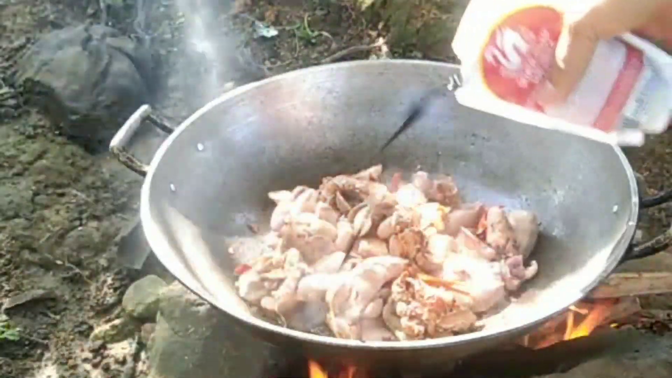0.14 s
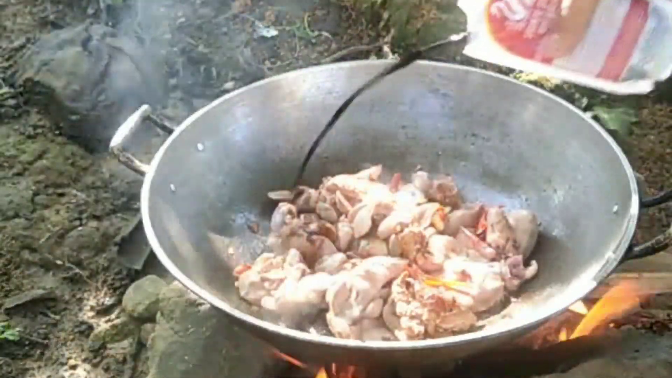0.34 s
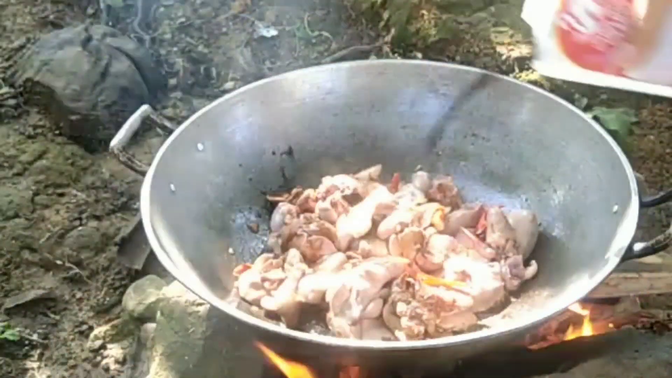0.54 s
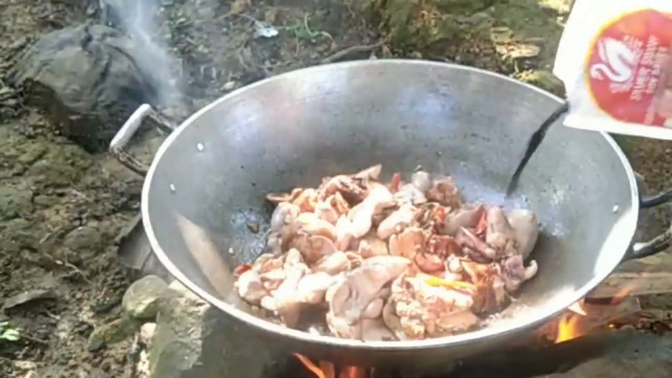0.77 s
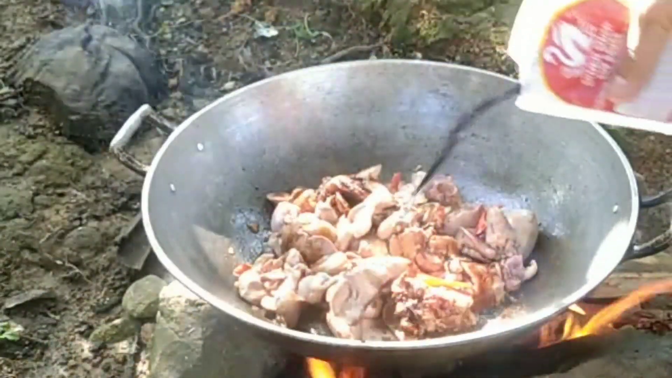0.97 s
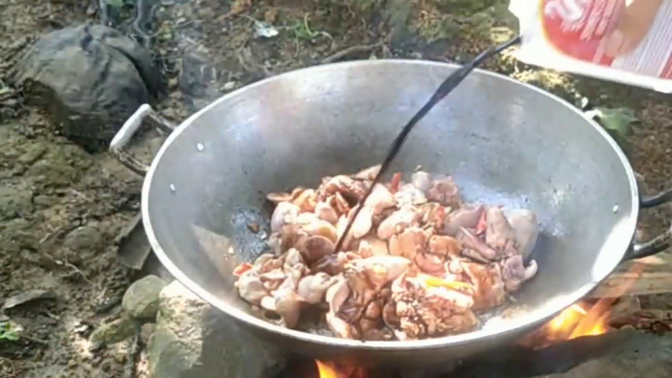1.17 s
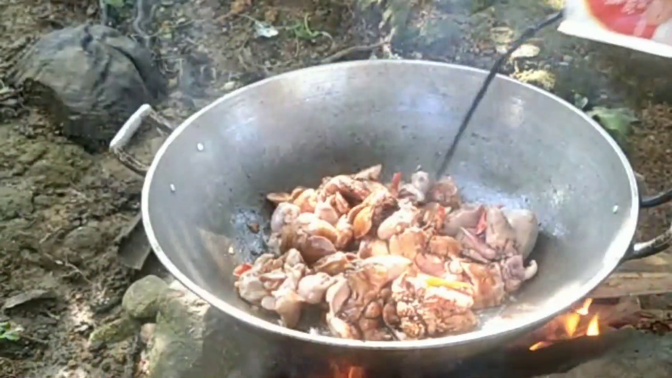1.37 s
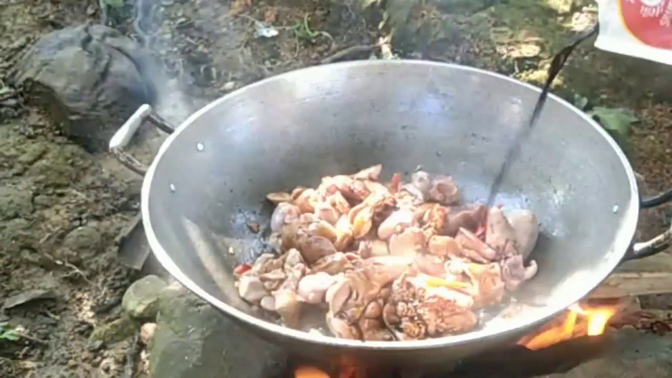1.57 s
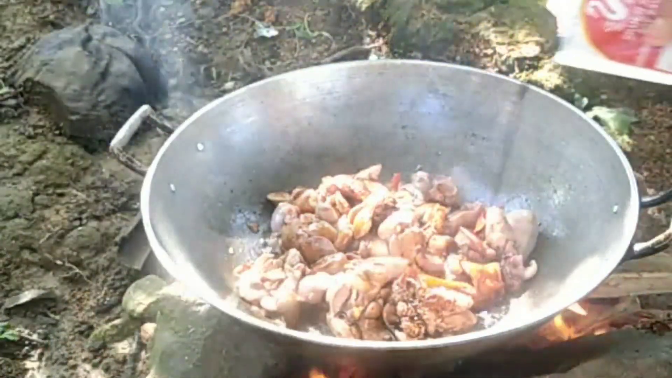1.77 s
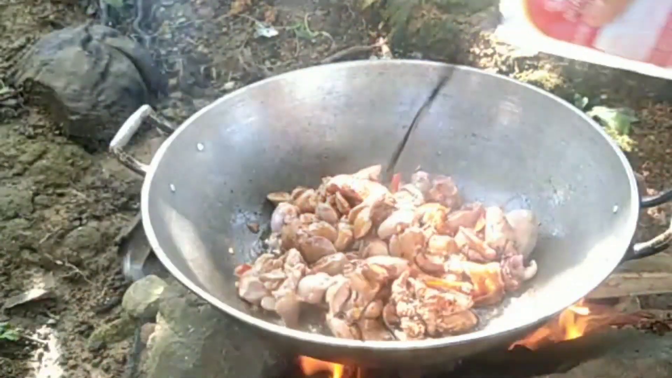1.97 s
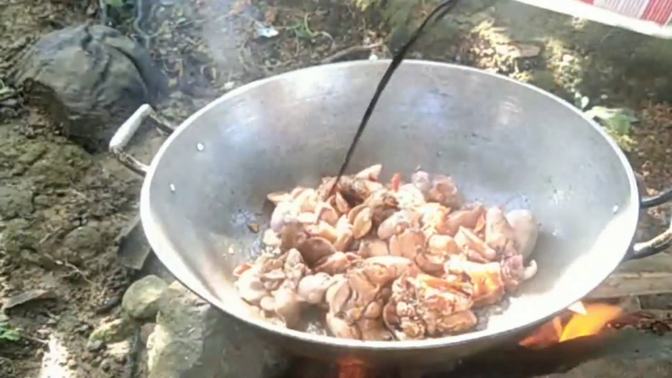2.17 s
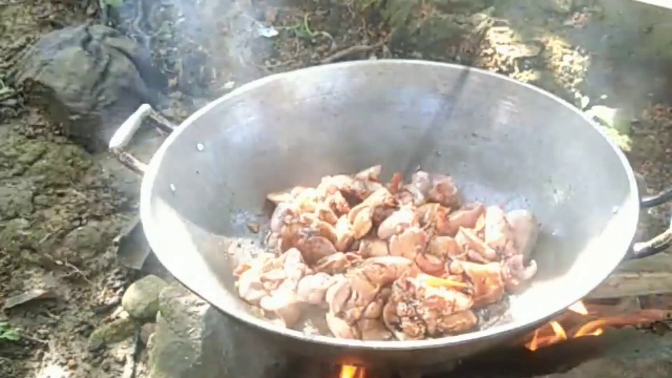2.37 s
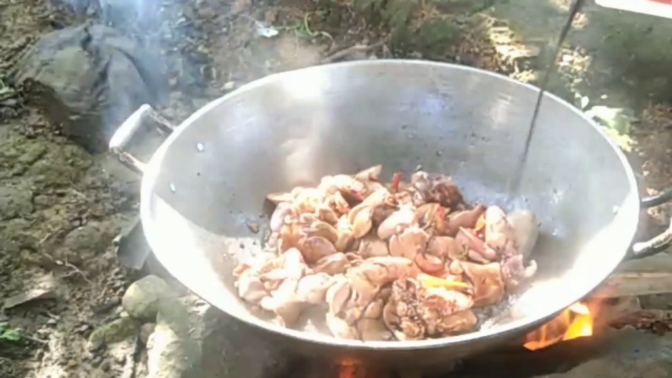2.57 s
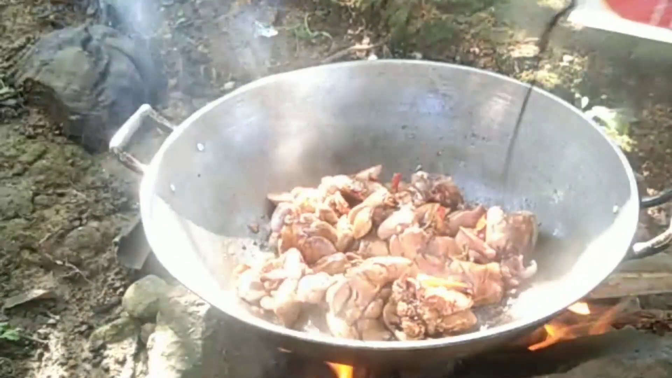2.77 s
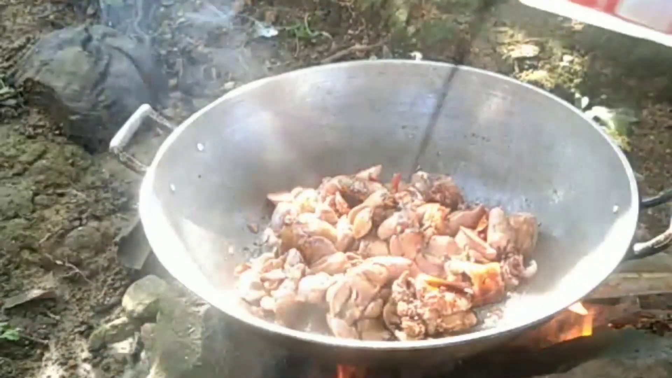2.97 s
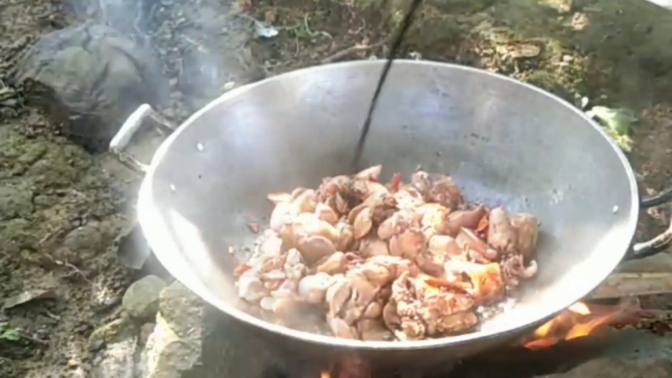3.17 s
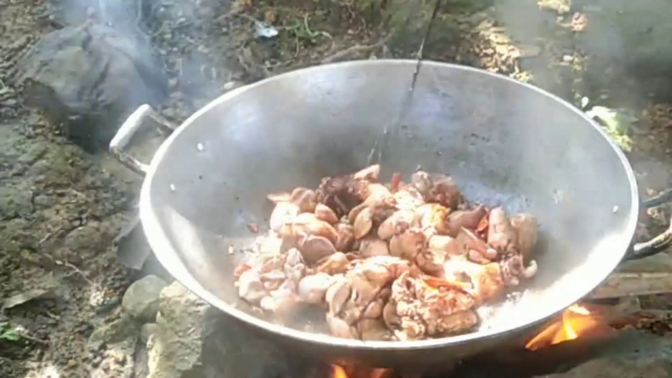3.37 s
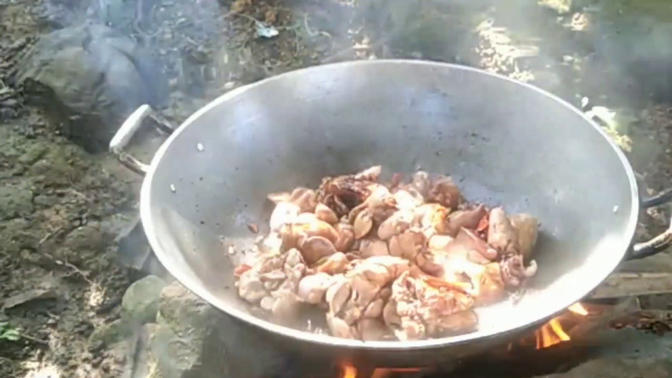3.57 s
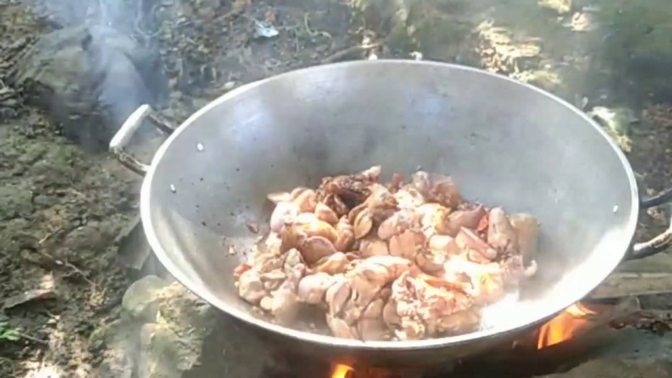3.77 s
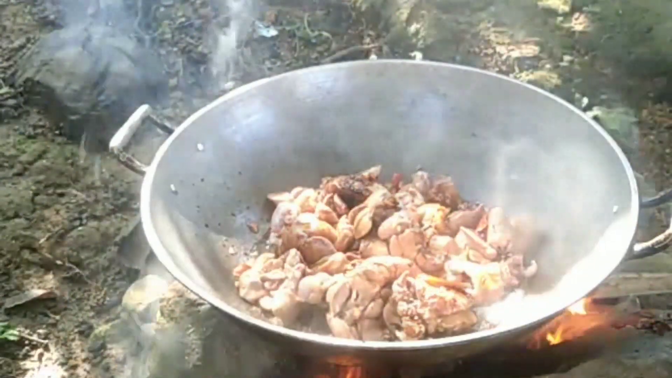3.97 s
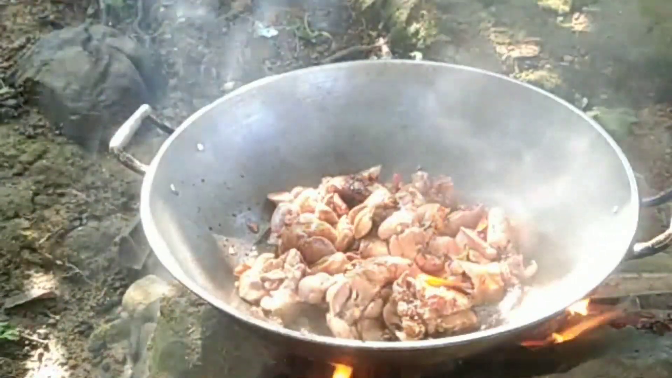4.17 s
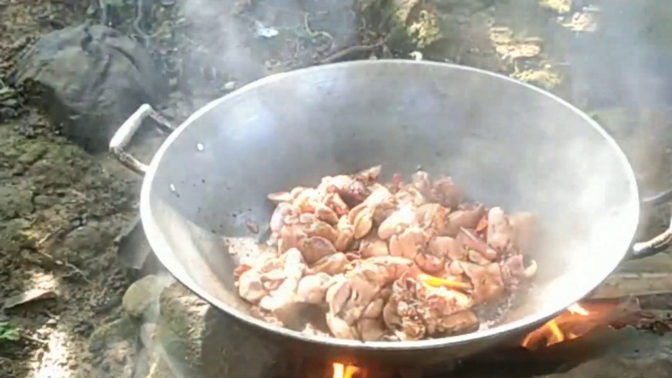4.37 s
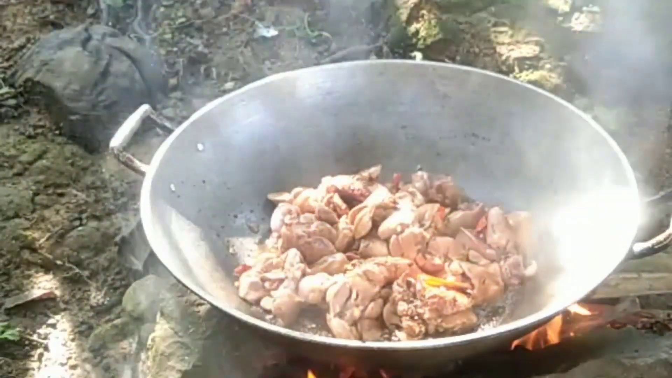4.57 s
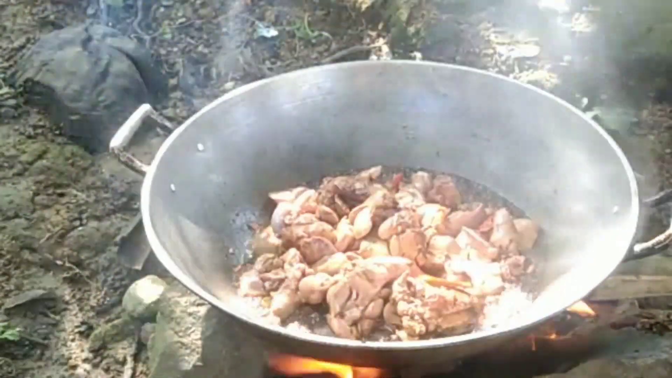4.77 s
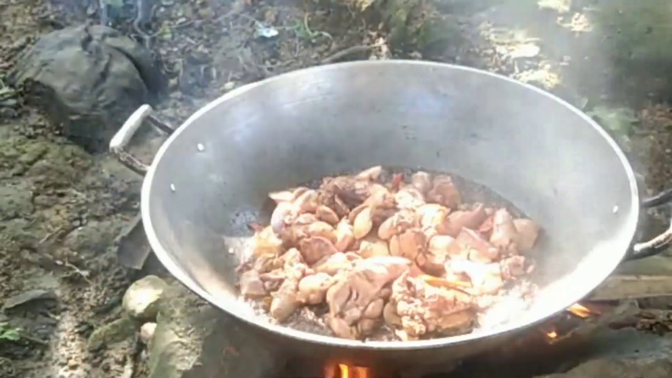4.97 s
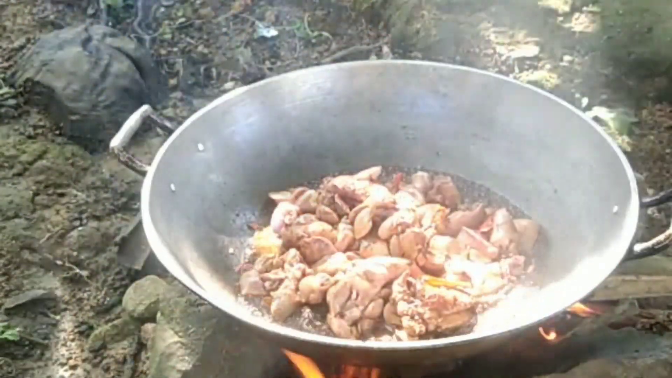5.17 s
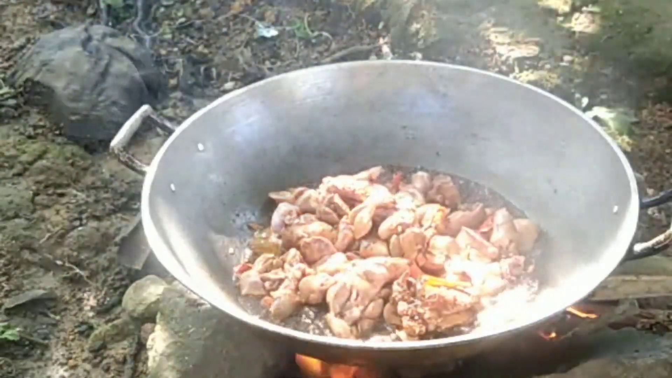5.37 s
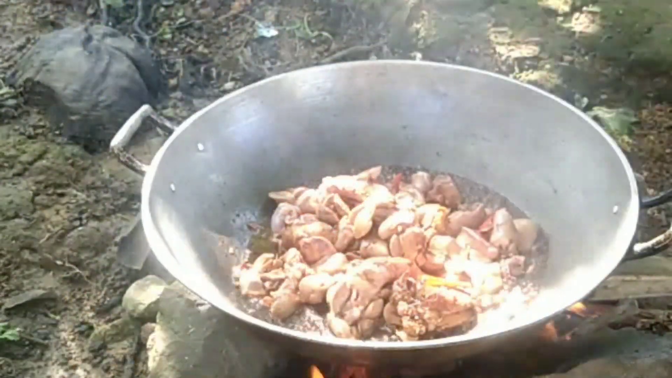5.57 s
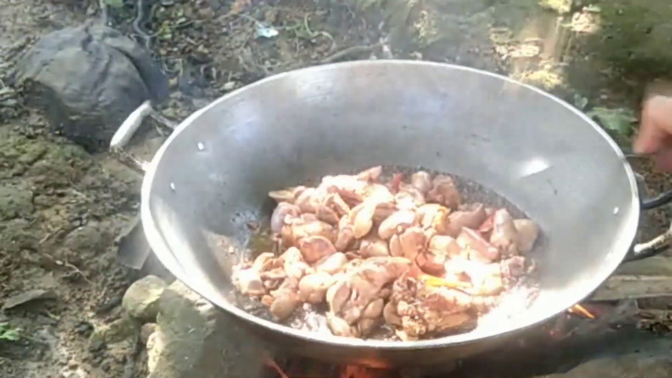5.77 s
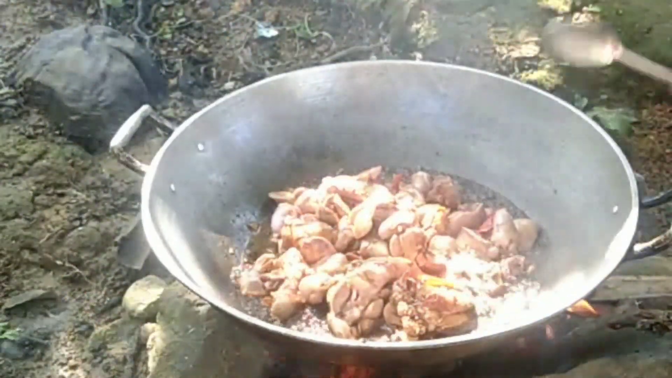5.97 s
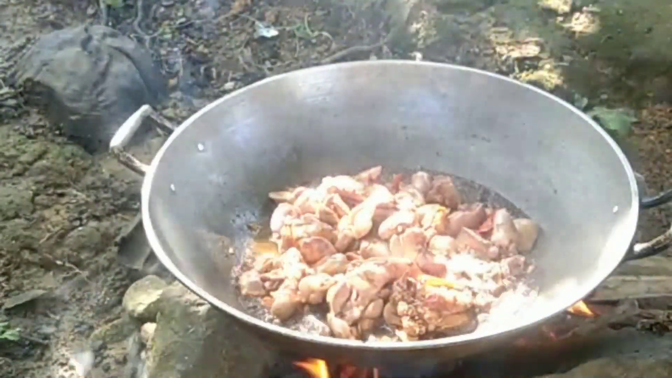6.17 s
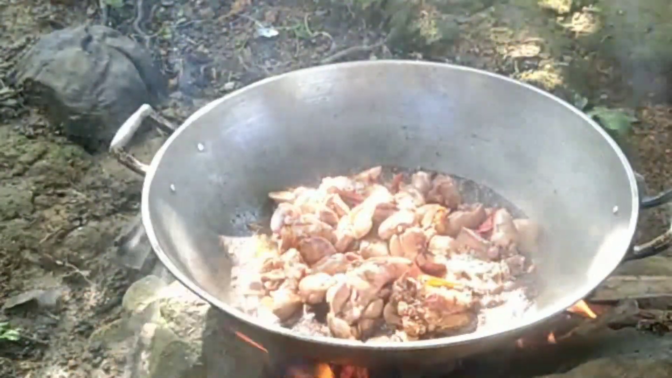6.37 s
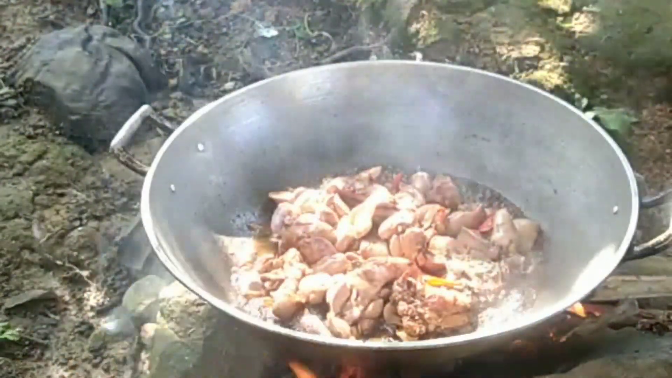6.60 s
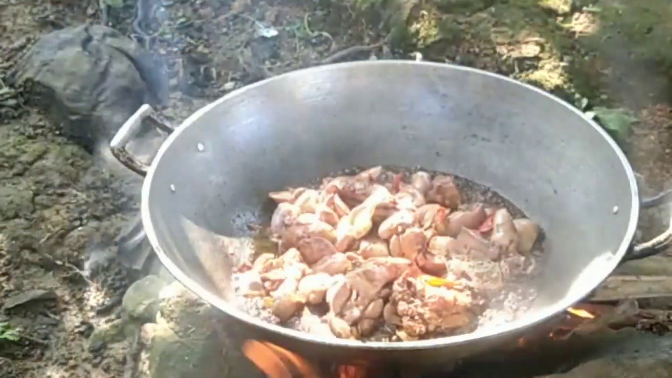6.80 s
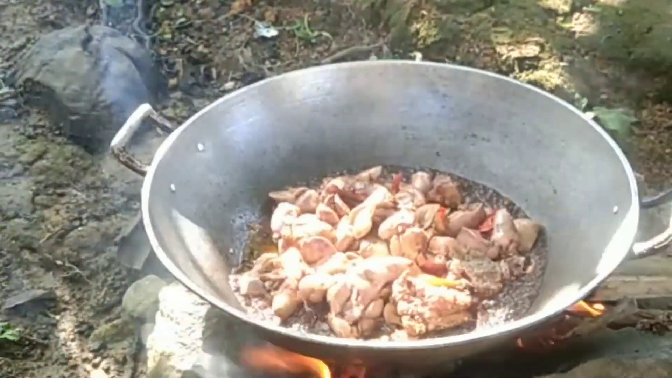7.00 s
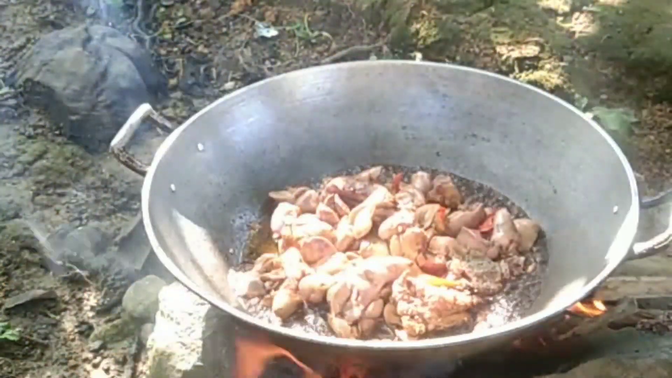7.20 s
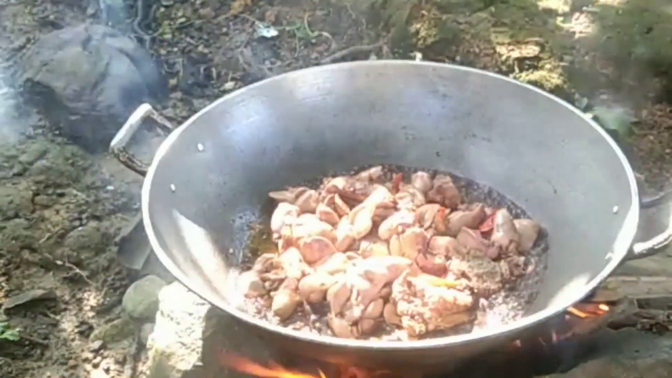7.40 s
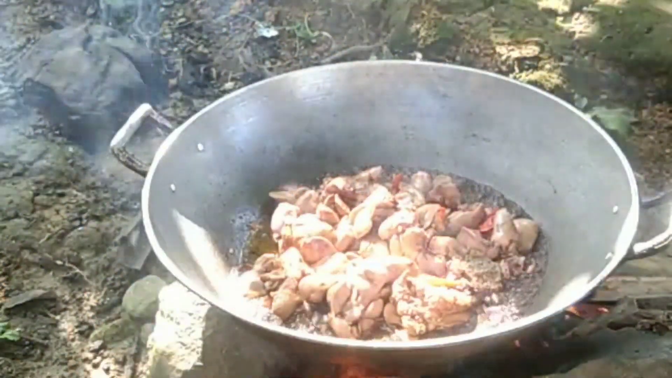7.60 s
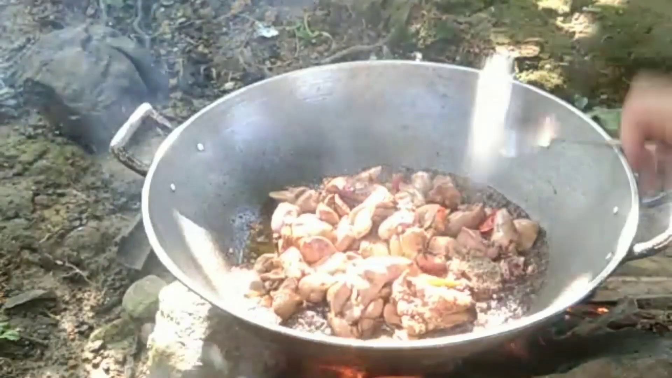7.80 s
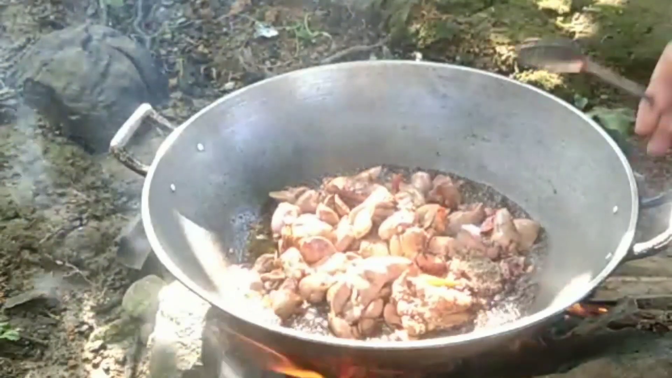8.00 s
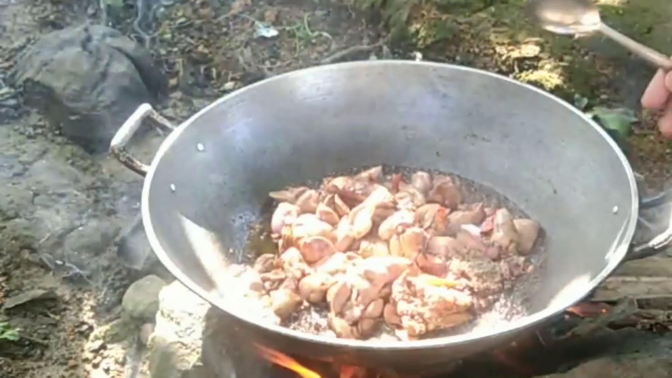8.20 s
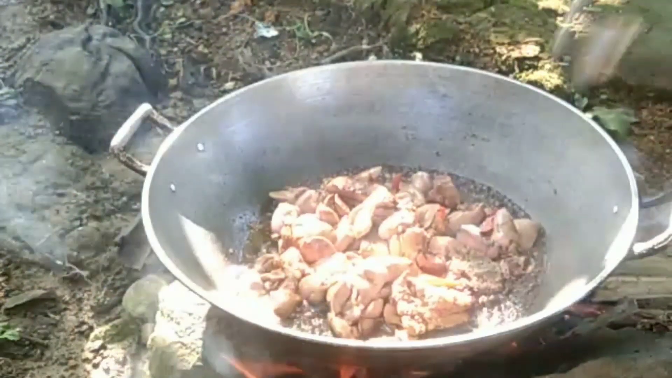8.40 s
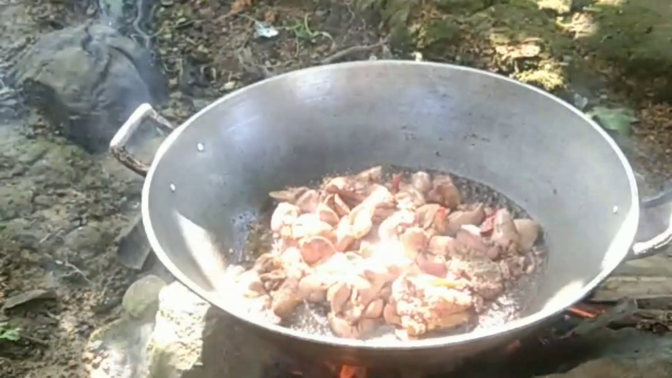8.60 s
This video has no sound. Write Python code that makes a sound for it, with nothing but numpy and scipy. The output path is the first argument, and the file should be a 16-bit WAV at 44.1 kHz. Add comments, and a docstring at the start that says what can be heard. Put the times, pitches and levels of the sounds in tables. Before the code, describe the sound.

Meat sizzles in a metal wok over an outdoor fire; poured sauce flares, gurgles and spits, then a spatula knocks sharply three times.

```python
"""Meat sizzles in a steel wok over a wood fire outdoors, near a mono microphone: dense random bursts, coloured
stage by stage. Sauce is poured in, flares, gurgles and spits as damped swings; later the sizzle steps down
twice. A metal spatula knocks three times as clusters of ringing modes; the cook shuffles and scrapes in noise.
Below, the fire and a breeze rumble as low noise, and a few soft gliding tones come from far away."""
import sys
import numpy as np
from scipy import signal
from scipy.fft import rfft, irfft, next_fast_len
from scipy.io import wavfile
from scipy.ndimage import map_coordinates

SR = 44100
rng = np.random.default_rng(int(sys.argv[2]) if len(sys.argv) > 2 else 0)


def digitize_waveform(pressure):
    """Quantize a signal to 16-bit integers and store it at the path in sys.argv[1].

    Rows of a 2-D input are taken as channels; values are limited to [-1, 1].
    """
    field = np.atleast_2d(pressure).T
    bounded = np.clip(field, -1, 1)
    quanta = np.round(bounded * 32767).astype(np.int16)
    wavfile.write(sys.argv[1], SR, quanta)


N = 381453


def amp(db):
    """Decibels to gain."""
    return 10 ** (np.asarray(db) / 20)


def unit(x):
    """x at rms 1."""
    return x / np.sqrt(np.mean(x ** 2) + 1e-20)


def wobble(rate):
    """A smooth random curve, rate knots a second."""
    knots = rng.standard_normal(int(N * rate / SR) + 4)
    return map_coordinates(knots, [np.arange(N) * rate / SR])


def filtered(x, response):
    """x times a response of frequency."""
    m = next_fast_len(N + SR // 2)
    return irfft(rfft(x, m) * response(np.fft.rfftfreq(m, 1 / SR)), m)[:N]


def high_pass(x, hz, order=4):
    """x without its lows."""
    return signal.sosfilt(signal.butter(order, hz, "highpass", fs=SR, output="sos"), x)


def coloured(x, points, size=4096):
    """x through a causal filter of unit energy shaped by (Hz, dB) points."""
    hz, db = np.transpose(points)
    gain = amp(np.interp(np.log(np.fft.rfftfreq(size, 1 / SR) + 1), np.log(hz), db))
    # Folding the cepstrum forward gathers the pulse at its onset (minimum phase)
    cepstrum = irfft(np.log(gain))
    cepstrum[1:size // 2] *= 2
    cepstrum[size // 2 + 1:] = 0
    pulse = irfft(np.exp(rfft(cepstrum)))
    return signal.fftconvolve(x, pulse / np.linalg.norm(pulse))[:len(x)]


def add(track, s, sound):
    """Mix a sound into the track at time s."""
    part = track[round(s * SR):][:len(sound)]
    part += sound[:len(part)]


def bursts(rate, spread_db, limit_db):
    """Random impulses, rate a second, of rms 1: many small ones, a few large."""
    count = int(rate * N / SR)
    when, chance, sign = rng.random((count, 3)).T
    size_db = np.minimum(-spread_db * np.log(1 - chance), limit_db)
    impulses = amp(size_db) * np.sign(sign - .5)
    return unit(np.bincount((when * N).astype(int), impulses, N))


def blips(rows, rise):
    """Damped swings (start_s, peak_db, pitch_hz, ringing_cycles) that swell over `rise` cycles."""
    out = np.zeros(N)
    for s, db, hz, cycles in rows:
        turns = np.arange(0, cycles, hz / SR)
        decay = amp(-60 * turns / cycles)
        swing = np.sin(2 * np.pi * turns) * decay * (1 - np.exp(-turns / rise))
        add(out, s, amp(db) * swing / np.abs(swing).max())
    return out


def swells(rows, attack_s, fall_db_per_s):
    """Sum of envelopes (start_s, length_s, height) that rise, hold and die away after their length."""
    t = np.arange(N) / SR
    total = np.zeros(N)
    for s, length, height in rows:
        rise = np.clip((t - s) / attack_s, 0, 1)
        fall = amp(-fall_db_per_s * np.maximum(t - s - length, 0))
        total += height * rise * fall
    return total


def swells_db(rows, attack_s, fall_db_per_s):
    """The same for rows (start_s, length_s, level_db)."""
    return swells([(s, length, amp(db)) for s, length, db in rows], attack_s, fall_db_per_s)


def sizzle():
    """Countless steam bubbles burst in the oil; sparser, larger ones spit on top. Each stage fades in."""
    # Frying, pouring, then two quieter spans, the level stepping down as each begins: start_s, fade_in_s,
    # sizzle_db, # sizzle_drift_db_per_s, bubbling_db, spatter_db (against the fizz, at the start of the stage)
    stages = [(0, 0.00084, -36.5, 0, -45, -12.5), (.52, 0.15, -33.5, 0.23, -43.5, -6),
              (4.79, 0.0034, -37.5, -1.37, -47.5, -10), (6.99, 0.0043, -44.5, 0.6, -49, -11)]
    # Colour of each stage before its lows and hiss are levelled: frequency_hz, level_db (per Hz)
    fry_tone = [(300, -39), (560, -34.5), (740, -9.5), (1100, -12.5), (1900, -5), (2800, -3), (5500, -3),
                (7600, -0.5), (8700, -3.5), (10000, -11), (12500, -20), (15500, -26)]
    pour_tone = [(250, -55), (400, -32.5), (600, -18.5), (740, -14.5), (920, -9), (1120, -17.5),
                 (1450, -10), (2300, -9), (3600, -5), (5000, -5.5), (6500, -2.5), (7700, 1), (9500, -7),
                 (12500, -18), (15500, -22)]
    third_tone = [(300, -40), (640, -24.5), (800, -10), (1150, -16), (1600, -8.5), (2500, -9), (3700, -7),
                  (5200, -7), (7700, -1.5), (9500, -9.5), (12500, -20), (15500, -24.5)]
    fourth_tone = [(300, -26), (640, -24), (820, -6), (1150, -14), (1600, -7), (2500, -7.5), (3800, -4.5),
                   (5200, -5.5), (7700, -1.5), (9500, -8.5), (12500, -20), (15500, -28)]
    # Liquid runs onto hot steel and the sizzle flares: start_s, length_s, rise_db
    flares = [(1.4, 0.068, 1.5), (1.74, 0.26, 4), (2.66, 1.3, 3), (3.55, 0.27, 3.5), (4.2, 0.39, 2),
              (6.38, 0.58, 2.5), (8.04, 0.71, 2)]
    spatter_dies_db_per_s = 0.5  # within each stage
    bubbles_follow, middle_follows = 0.24, 0.6  # shares of a flare that large and middling bubbles take
    pool_lift_db = 2.5  # the large bubbles grow by this much at the fullest boil

    t = np.arange(N) / SR
    starts, *_, spatters = np.transpose(stages)
    stage = np.searchsorted(starts[1:], t)
    spatter_db = spatters[stage] - spatter_dies_db_per_s * (t - starts[stage])
    fizz_flicker = amp(0.24 * wobble(45) + 0.78 * wobble(220))
    fizz = bursts(rate=14000, spread_db=3.5, limit_db=8.0) * fizz_flicker
    spit = bursts(rate=350, spread_db=6, limit_db=16) * amp(spatter_db + wobble(25))
    steam = filtered(fizz + bowl(spit, echo_db=-6.0, t60=0.024), wok_colour)
    plinks = amp(-11.0) * ringing_bubbles(rate=220, centre_hz=1702, octaves=2.113, spread_db=19, cycles=82)

    flare_db = swells(flares, attack_s=.18, fall_db_per_s=85) + 0.62 * wobble(8)
    boil = pool()
    flicker = amp(0.6 * wobble(20))
    large_gain = amp(bubbles_follow * flare_db + pool_lift_db * boil / boil.max() + 0.32 * wobble(35))

    out = np.zeros(N)
    tones = [fry_tone, pour_tone, third_tone, fourth_tone]
    for (start, fade_s, sizzle_db, drift, bubble_db, _), tone in zip(stages, tones):
        frying = coloured(steam, tone)
        low = filtered(frying, lambda hz: 1 / (1 + (hz / 3400) ** 4))  # large bubbles sound low
        hiss = unit(frying - low)
        middle = filtered(hiss, lambda hz: 1 / (1 + (hz / 5600) ** 6))
        fine = hiss - middle
        flaring = amp(middle_follows * flare_db) * middle + amp(flare_db) * fine  # the finest flare most
        small = amp(sizzle_db + drift * (t - start)) * flicker * flaring
        large = amp(bubble_db) * large_gain * unit(unit(low) + plinks)
        share = np.clip((t - start) / fade_s, 0, 1)
        out = (1 - share) * out + share * (small + large)
    return out


def wok_colour(hz):
    """The bowl strengthens some frequencies and hollows out others."""
    # Peaks and hollows of the bowl of the wok: centre_hz, width_hz, level_db
    wok_modes = [(1327, 160, 2.5), (1580, 69, -1), (1800, 78, -0.5), (1943, 130, -3.5), (2370, 63, 0),
                 (3070, 59, 1.8), (3140, 89, -2), (3470, 98, 0.5), (3900, 83, 1), (4392, 120, -0.5),
                 (5110, 120, 1)]
    return amp(sum(db * np.exp(-((hz - centre) / width) ** 2) for centre, width, db in wok_modes))


def bowl(x, echo_db, t60):
    """The curved wall of the wok throws back a brief scatter."""
    t = np.arange(SR // 20) / SR
    scatter = rng.standard_normal(len(t)) * amp(-60 * t / t60)
    return x + amp(echo_db) * signal.fftconvolve(x, scatter / np.linalg.norm(scatter))[:N]


def ringing_bubbles(rate, centre_hz, octaves, spread_db, cycles):
    """Larger bubbles that each ring briefly at their own pitch, rms 1."""
    when, size, pitch, life = rng.random((int(rate * N / SR), 4)).T
    hz = centre_hz * 2 ** (octaves * (pitch - .5))
    db = spread_db * size + 10 * np.log10(hz / centre_hz)  # high ones are shorter, but as strong
    rows = np.transpose([when * N / SR, db, hz, cycles * (.5 + life)])
    return unit(high_pass(blips(rows, rise=1.7), 800))


def pool():
    """Gain of the boiling sauce, which gathers in the bottom and steams off."""
    # Sauce pools and boils: start_s, length_s, level_db
    pools = [(.68, 0.34, -57.5), (1.4, 1.12, -61.5), (2.55, 1.56, -58.5), (4.4, 0.51, -71.5)]
    return swells_db(pools, attack_s=0.28, fall_db_per_s=68)


def gurgle():
    """The pool of fresh sauce boils in low bubbles, some of which ring, until it has steamed off."""
    # Colour of the low froth: frequency_hz, level_db (per Hz)
    gurgle_tone = [(220, -16.5), (320, -22), (420, 1.5), (560, 7), (700, -2.5), (1000, -31)]
    glugs_per_s, glug_hz, glug_cycles = 32, 479, 34  # pitch is the centre of an octave
    glug_db = -10  # against the froth

    froth = coloured(bursts(rate=700, spread_db=3.5, limit_db=13), gurgle_tone)
    when, size, pitch = rng.random((int(glugs_per_s * N / SR), 3)).T
    rows = [(s * N / SR, 12 * loudness, glug_hz * 2 ** (octave - .5), glug_cycles)
            for s, loudness, octave in zip(when, size, pitch)]
    glugs = unit(blips(rows, rise=1.7))
    return pool() * amp(2.2 * wobble(14)) * (froth + amp(glug_db) * glugs)


def pops():
    """Droplets of sauce explode in the hot oil as damped swings: set ones and random others."""
    # Droplets bursting at set times: start_s, peak_db (before the bowl's scatter), pitch_hz, ringing_cycles
    set_pops = [(.8615, -15, 3800, 5), (.9067, -2, 3500, 3), (.9070, -5, 7200, 5), (.9085, -22, 750, 2),
                (.9575, -13, 7700, 8), (.9755, -14, 5500, 4), (1.073, -23, 1500, 3),
                (1.0855, -23, 2200, 3), (1.205, -16, 3800, 5), (1.4454, -12, 7500, 9),
                (1.5372, -13, 6000, 6), (1.542, -24, 1900, 4), (1.7143, -8.5, 7500, 12),
                (1.8659, -16, 4200, 5), (2.0264, -23, 2000, 4), (2.0582, -16, 4400, 5),
                (2.6058, -20, 2600, 6), (2.6546, -12, 7700, 9), (2.8737, -23, 1800, 4),
                (2.9926, -22, 2100, 4), (3.5088, -14, 2200, 8), (3.5735, -13, 7600, 11),
                (3.6085, -11, 7800, 8), (4.0568, -20.5, 1900, 8), (4.0575, -13, 3600, 5),
                (4.0583, -6.5, 7200, 6), (4.2607, -24, 2300, 6), (4.6545, -26, 1800, 4),
                (4.9272, -19, 3200, 16), (4.9278, -29, 1150, 2.5)]
    # Further droplets burst at random while the sauce is poured
    first, last = .85, 4.3  # s
    droplets_per_s = 5
    droplet_db, droplet_hz, droplet_cycles = -17, 7000, 7  # centres of the random level and pitch

    when, size, pitch = rng.random((int(droplets_per_s * (last - first)), 3)).T
    times = first + (last - first) * when
    levels_db = droplet_db + 6 * (size - .5)
    pitches_hz = droplet_hz * 2 ** (.5 * (pitch - .5))
    droplets = [(s, db, hz, droplet_cycles) for s, db, hz in zip(times, levels_db, pitches_hz)]
    snaps = blips(list(set_pops) + droplets, rise=.2)
    return high_pass(bowl(snaps, echo_db=-12, t60=.02), 600, order=4)


def spatula():
    """Each knock chatters in a few quick contacts; the blade rebounds with dull jolts and a faint rattle."""
    # Contacts, a few to each knock: start_s, crack_db, steel_ring_db, dull_knock_db,
    # ring_tilt_db_per_octave, hand_damping_db_per_s
    knocks = [(5.8678, -13, -16, -22, 0, 90), (5.8703, -16, -13, -35, -2, 110),
              (5.8768, -18.5, -21, -26, -3, 90), (5.903, -38, -33, -38, 0, 20),
              (5.926, -38, -28, -41, -2, 60), (7.9040, -18.5, -38, -16, 6, 90),
              (7.9067, -21, -24, -20.5, 16, 90), (7.9482, -37, -32, -55, 9, 200),
              (8.3993, -17.5, -12.5, -22.5, -6, 20), (8.401, -23, -13, -28, 4, 20),
              (8.4233, -29, -30, -33, 2, 20), (8.460, -51, -33, -48, -12, 20)]
    # Dull jolts after each knock: start_s, peak_db (before the echo), pitch_hz
    rebounds = [(5.880, -27, 380), (5.892, -24, 360), (5.910, -29, 300), (5.9195, -19.5, 330),
                (5.936, -24, 400), (5.9445, -29, 410), (5.972, -35, 290), (7.932, -26, 370),
                (7.948, -35, 400), (7.964, -26, 400), (7.9725, -29, 300), (8.413, -30, 380),
                (8.4235, -19, 370), (8.440, -32, 300), (8.458, -31, 330)]
    # One rattle against its jolt: crack_db, steel_ring_db, dull_knock_db
    rattle_db = (-16, -15, -13)

    out = np.zeros(N)
    for s, *blow in knocks:
        add(out, s, contact(*blow))
    for s, db, _ in rebounds:
        add(out, s, amp(db) * contact(*rattle_db))
    jolts = blips([(s, db, hz, 5.5) for s, db, hz in rebounds], rise=0.18)  # 5.5 ringing cycles each
    return high_pass(out + bowl(jolts, echo_db=-9, t60=.09), 166, order=2)


def contact(crack_db, steel_db, block_db, tilt_db=0, grip_db_per_s=0):
    """One touch cracks and rings the blade, which the hand damps; the spot struck tilts the ring."""
    # Colour of the crack: frequency_hz, level_db (per Hz)
    crack_tone = [(200, -11), (500, 2), (1000, -5), (2000, 0.5), (3200, 0.5), (5000, 2), (8000, 1),
                  (9500, -8), (15000, -22.5)]
    # Clusters of close modes of the blade: frequency_hz, level_db, t60_s (before the damping below)
    steel_modes = [(3350, -2, .32), (3550, -1, .38), (3720, 1, .36), (3850, -1, .32), (4250, -4, .3),
                   (4460, 0, .3), (4720, -1, .3), (4920, 0, .3), (5220, -2, .28), (5410, -1, .28),
                   (5680, -3, .3), (5990, -5, .27), (6340, -12, .2), (7450, -14, .16)]
    # Short resonances of what it strikes: frequency_hz, level_db, t60_s
    block_modes = [(327, -5, .05), (435, 3, 0.043), (500, 1, .035), (760, -2, 0.035), (1290, -3, .045),
                   (1460, 4.5, .045), (1978, 5, .055), (2315, 3, .05), (3150, 4, .025), (5270, 0, .06),
                   (6150, 4.5, 0.069), (7550, 0.5, .06), (7820, -5, 0.054), (8280, 1, .05)]

    t = np.arange(SR // 3) / SR
    attack = 1 - np.exp(-t / 0.00024)
    decay = amp(-60 * t / 0.03) + amp(-19.5 - 60 * t / 0.45)  # the blow, then the yard's answer
    crack = coloured(rng.standard_normal(len(t)) * decay, crack_tone)
    lowest_hz = steel_modes[0][0]
    tilted = [(hz, db + tilt_db * np.log2(hz / lowest_hz), t60) for hz, db, t60 in steel_modes]
    blade = ring(tilted, t, spread_db=2, detune=.026, count=10)
    damping = amp(-60 * t / 0.036) + amp(-14.0 - grip_db_per_s * t)  # a quick drop, then a fainter tail
    block = ring(block_modes, t, spread_db=2, detune=0.012, count=2)
    return attack * (amp(crack_db) * crack + amp(steel_db) * blade * damping + amp(block_db) * block)


def ring(modes, t, spread_db, detune, count):
    """Clusters of count close modes struck at new strengths, rms 1 at the start."""
    hz, db, t60 = np.repeat(modes, count, axis=0).T[:, :, None]
    hz = hz * (1 + detune * rng.uniform(-1.1, 1, hz.shape))
    strength = amp(db + spread_db * rng.standard_normal(hz.shape))
    waves = np.sin(2 * np.pi * (hz * t + rng.random(hz.shape))) * amp(-60 * t / t60)
    return (strength * waves).sum(0) / np.sqrt(np.sum(strength ** 2) / 2)


def shuffling():
    """Soft bumps as the cook shuffles: grainy bursts, each muffled above its own edge."""
    # Colour of the scuffing: frequency_hz, level_db (per Hz)
    shuffle_tone = [(70, -18), (130, 1), (200, 1), (350, -1.5), (500, -2), (650, -5.5), (1500, -48)]
    # Bumps: start_s, length_s, level_db, upper_edge_hz
    shuffles = [(5.927, 0.05, -49, 700), (6.992, 0.0097, -54.5, 600), (7.147, 0.045, -49, 395),
                (7.25, 0.073, -57, 330), (7.491, 0.05, -48.5, 716), (7.59, .03, -49.5, 720),
                (7.645, .025, -53, 620), (7.805, 0.043, -48, 620), (8.426, .03, -46, 700),
                (8.5, 0.11, -57, 450)]

    grains = bursts(rate=1500, spread_db=2.0, limit_db=10)
    scuff = amp(1.2 * wobble(30)) * coloured(grains, shuffle_tone)
    steps = np.zeros(N)
    for s, length, db, edge_hz in shuffles:
        muffled = unit(filtered(scuff, lambda hz: 1 / np.hypot(1, (hz / edge_hz) ** 3)))
        steps += swells_db([(s, length, db)], attack_s=0.0098, fall_db_per_s=165) * muffled
    return steps


def scrape():
    """A low, even scrape of coloured noise as the cook shifts."""
    # The one scrape: start_s, length_s, level_db
    rub_swell = (6.21, 0.17, -52.5)
    # Its colour: frequency_hz, level_db (per Hz)
    rub_tone = [(90, -26), (145, -5), (180, 0.5), (215, -5), (270, -14), (360, -8), (440, -27), (900, -40)]
    envelope = swells_db([rub_swell], attack_s=0.022, fall_db_per_s=140)
    return envelope * coloured(rng.standard_normal(N), rub_tone)


def fire():
    """The wood fire rumbles as low noise of unsteady level."""
    # Colour of the rumble: frequency_hz, level_db (per Hz)
    rumble_tone = [(20, -29), (40, -9), (70, 0), (125, 4), (170, -4.5), (230, -18), (330, -41), (600, -36)]
    return amp(-62.5 + 2.4 * wobble(23)) * coloured(rng.standard_normal(N), rumble_tone)


def breeze():
    """Air puffs on the microphone: swells of low noise, with low damped thumps among them."""
    # Gusts: start_s, length_s, level_db
    gusts = [(.26, 0.015, -54), (.58, .03, -50), (1.968, 0.017, -44), (2.055, 0.061, -45.5),
             (2.165, 0.075, -41), (2.26, 0.16, -54.5), (4.69, 0.023, -54), (6.49, 0.09, -51),
             (7.0, 1.65, -61), (7.085, 0.022, -44.5), (7.21, 0.1, -47), (8.29, 0.023, -45)]
    # Colour of the puffing air: frequency_hz, level_db (per Hz)
    buffet_tone = [(25, -25), (50, -7), (80, -1), (130, -4.5), (200, -16), (400, -45.5)]
    # Low thumps among the gusts: start_s, peak_db, pitch_hz
    gust_thumps = [(1.98, -39, 85), (2.066, -38, 100), (2.102, -36, 75), (2.19, -31, 120),
                   (2.195, -39, 270)]
    envelope = swells_db(gusts, attack_s=0.0087, fall_db_per_s=340)
    air = envelope * coloured(rng.standard_normal(N), buffet_tone)
    thumps = blips([(s, db, hz, 5) for s, db, hz in gust_thumps], rise=.3)  # 5 ringing cycles each
    return air + thumps


def far_tones():
    """A few soft, wavering tones carry from far away: gliding sines that flutter in level."""
    # Faint tones: start_s, length_s, start_hz, end_hz, level_db (before the flutter)
    faint_tones = [(4.802, 0.15, 510, 480, -57), (5.17, 0.22, 835, 900, -53), (6.09, 0.12, 395, 380, -62),
                   (6.38, 0.092, 1140, 1050, -51)]
    out = np.zeros(N)
    for s, length, start_hz, end_hz, db in faint_tones:
        glide = np.linspace(start_hz, end_hz, int(length * SR))
        hz = glide * (1 + 0.011 * wobble(66)[:len(glide)])
        flutter = amp(2.5 * wobble(45)[:len(hz)])
        tone = np.sin(2 * np.pi * np.cumsum(hz) / SR)
        add(out, s, amp(db) * flutter * np.hanning(len(hz)) * tone)
    return out


def dips():
    """Gain that drops out at once and comes straight back: the level dips briefly."""
    dip_times_s, recovery_s = (4.7905, 6.9905), .013
    t = np.arange(N) / SR
    gains = [np.where(t < s, 1, np.minimum((t - s) / recovery_s, 1)) for s in dip_times_s]
    return np.prod(gains, axis=0)


def scene():
    """Everything reaches one microphone."""
    pan = sizzle() + gurgle() + pops()
    surroundings = high_pass(shuffling() + scrape() + fire() + breeze(), 39, order=2)
    mono = dips() * (pan + spatula() + surroundings + far_tones())
    return np.array([mono, mono])


def record(dry):
    """The recorder rounds off the tallest peaks and keeps nothing above its band limit."""
    top_hz = 15650
    rounded = dry / (1 + np.abs(dry / .85) ** 6) ** (1 / 6)
    return np.array([filtered(channel, lambda hz: hz < top_hz) for channel in rounded])


dry = scene()
out = record(dry)
digitize_waveform(out)
```